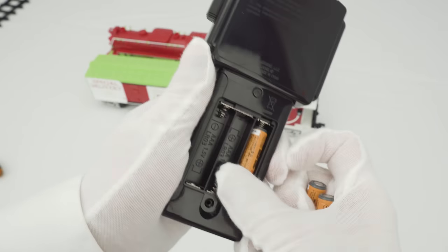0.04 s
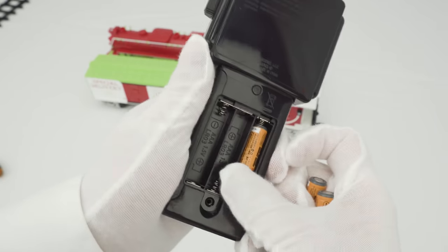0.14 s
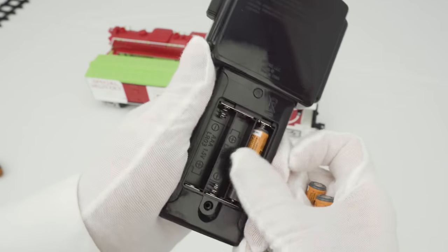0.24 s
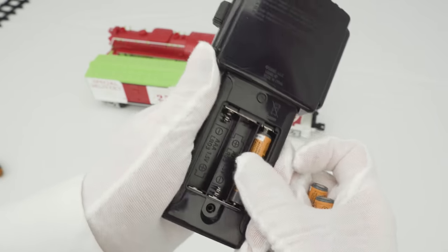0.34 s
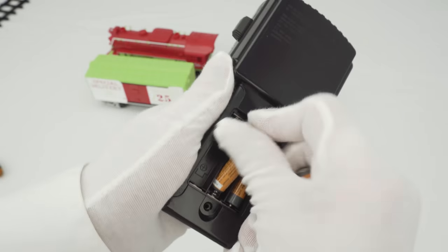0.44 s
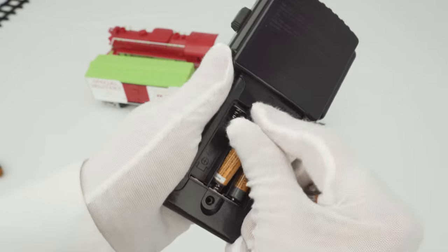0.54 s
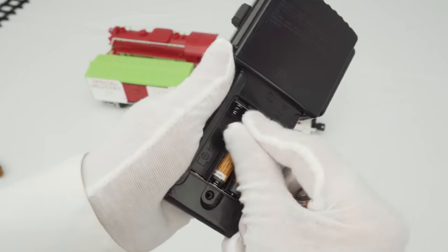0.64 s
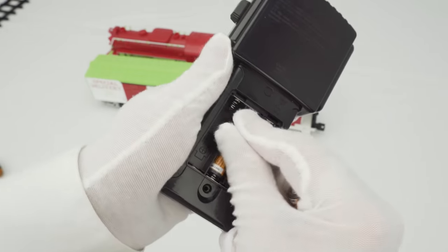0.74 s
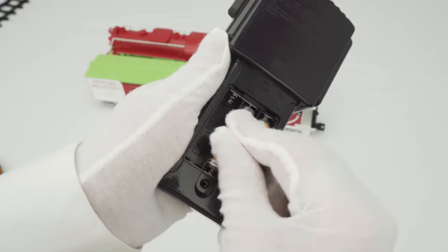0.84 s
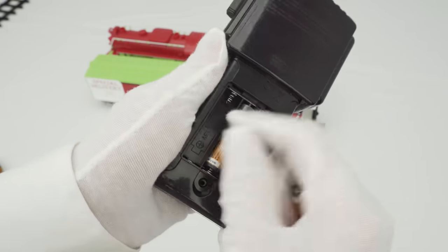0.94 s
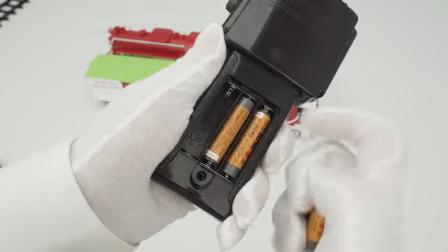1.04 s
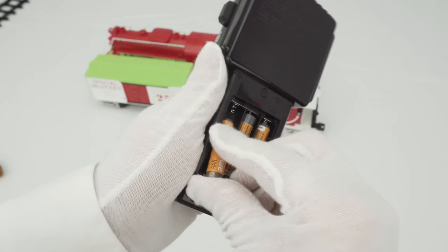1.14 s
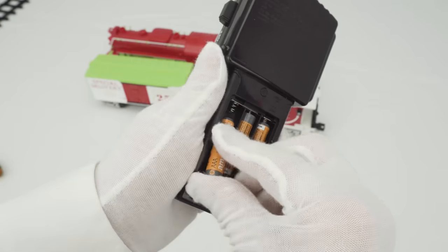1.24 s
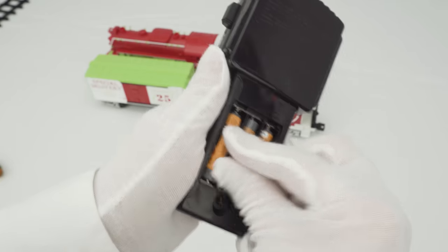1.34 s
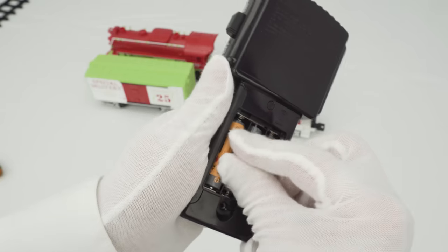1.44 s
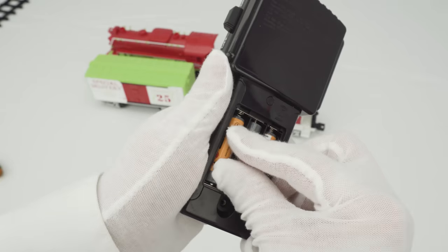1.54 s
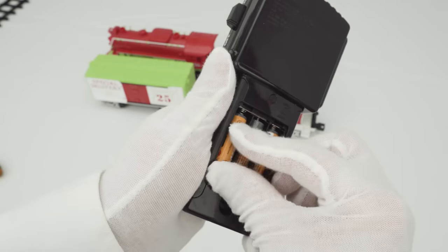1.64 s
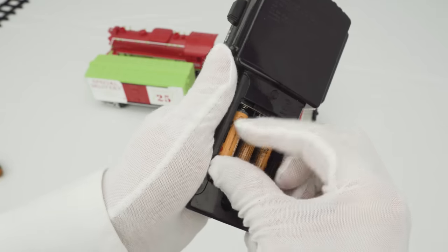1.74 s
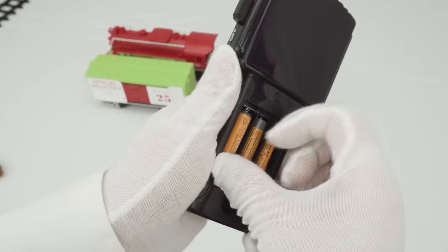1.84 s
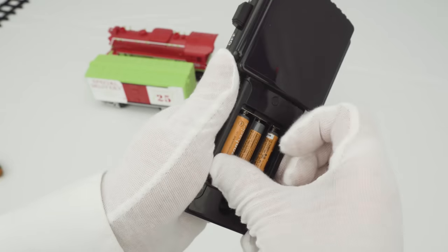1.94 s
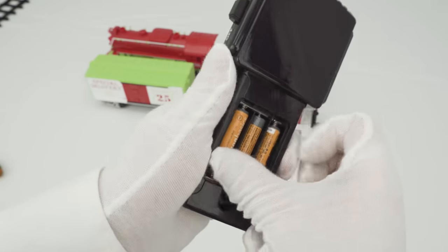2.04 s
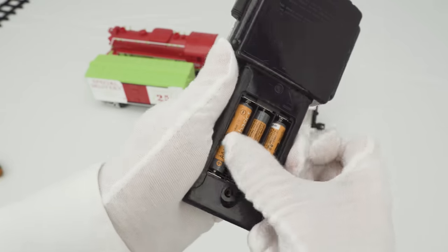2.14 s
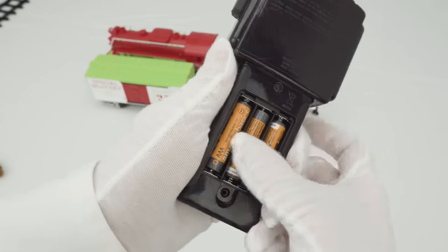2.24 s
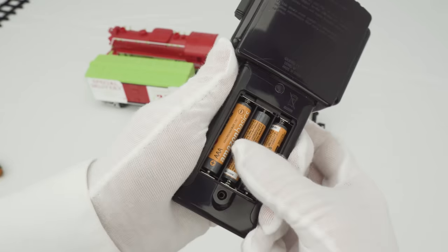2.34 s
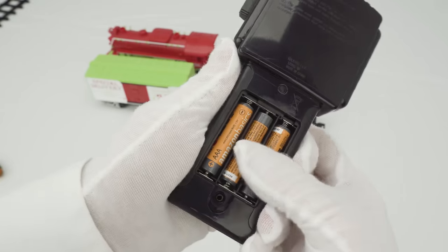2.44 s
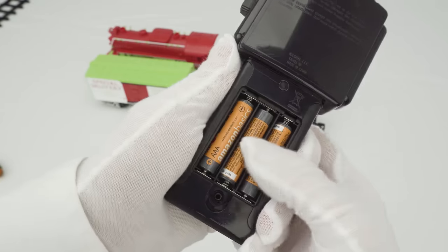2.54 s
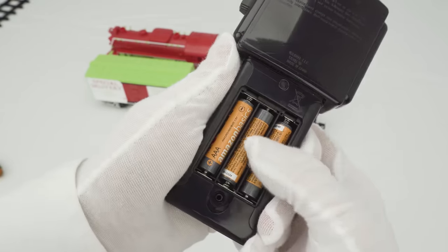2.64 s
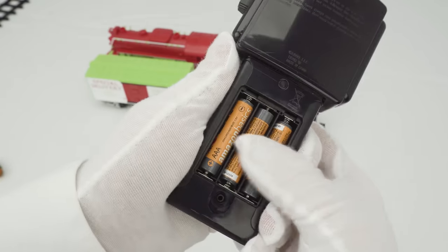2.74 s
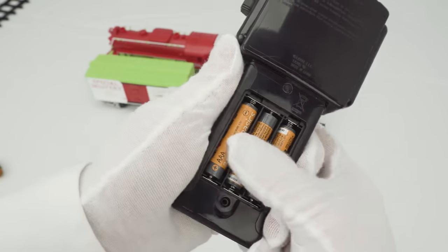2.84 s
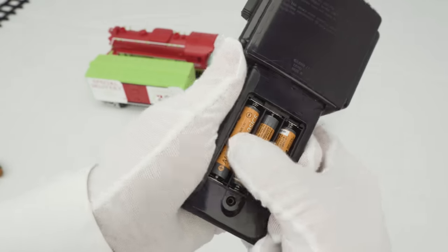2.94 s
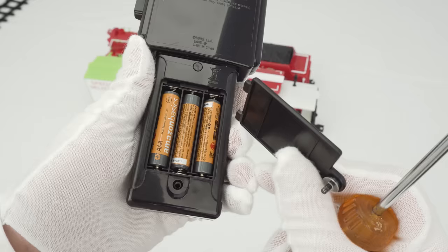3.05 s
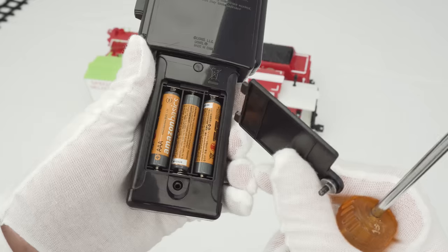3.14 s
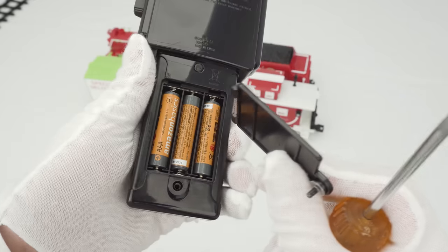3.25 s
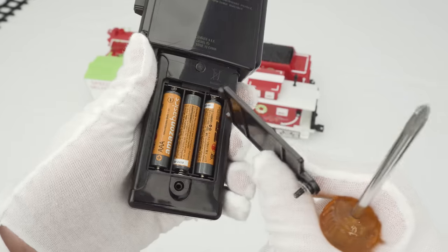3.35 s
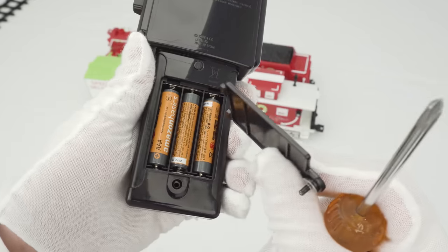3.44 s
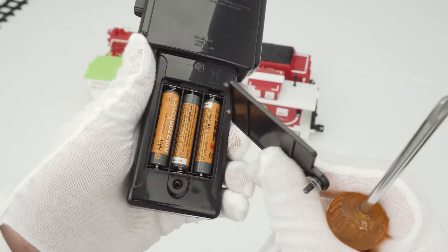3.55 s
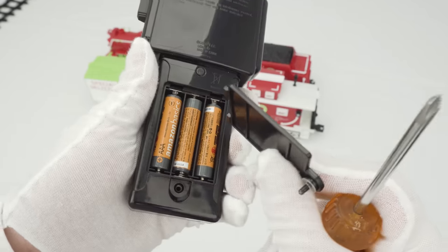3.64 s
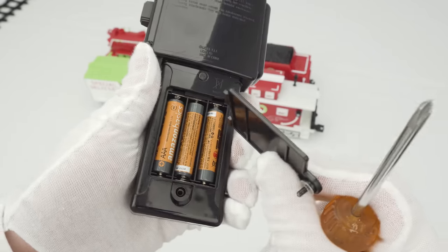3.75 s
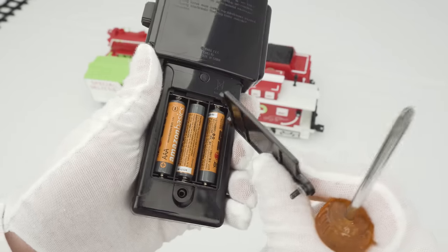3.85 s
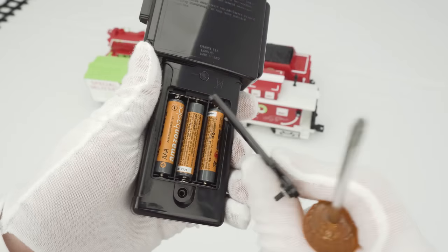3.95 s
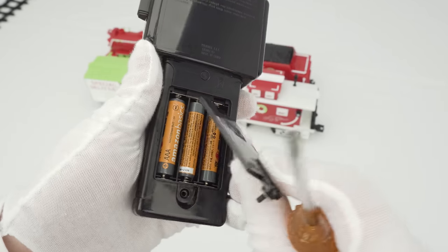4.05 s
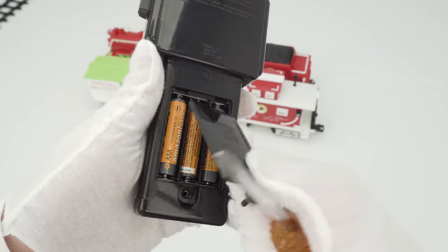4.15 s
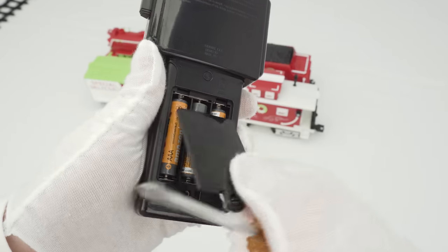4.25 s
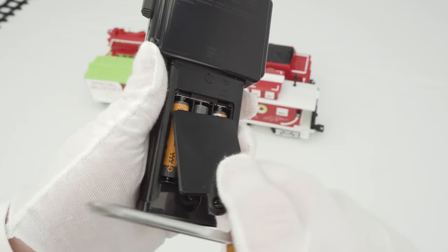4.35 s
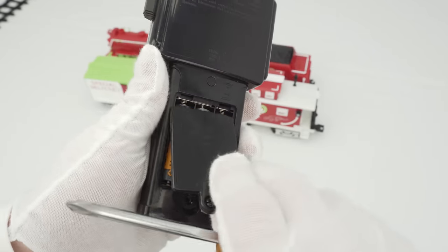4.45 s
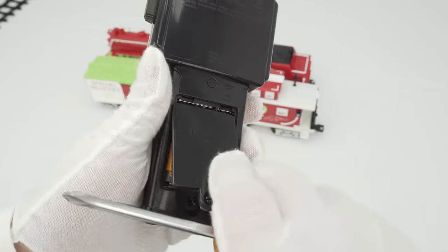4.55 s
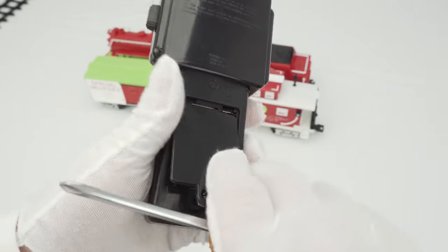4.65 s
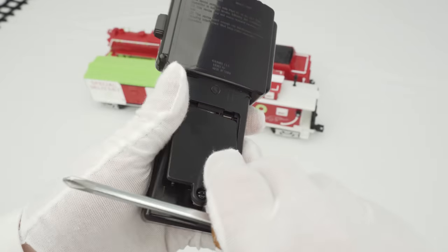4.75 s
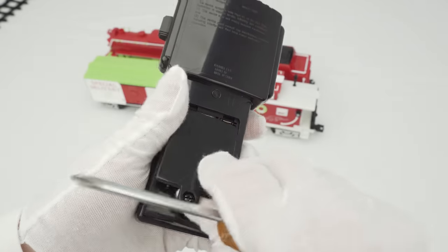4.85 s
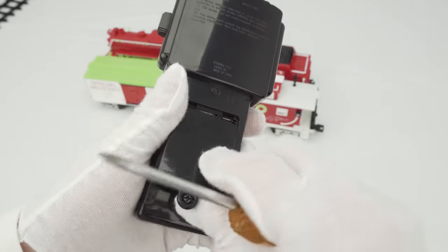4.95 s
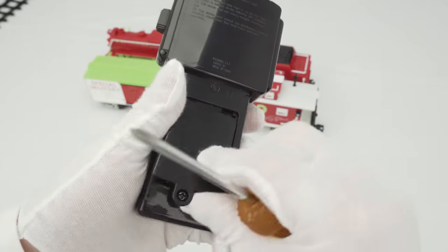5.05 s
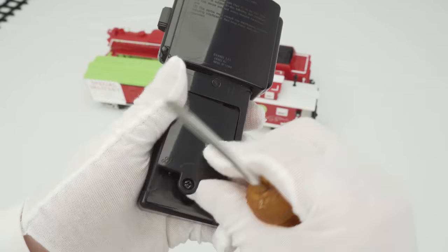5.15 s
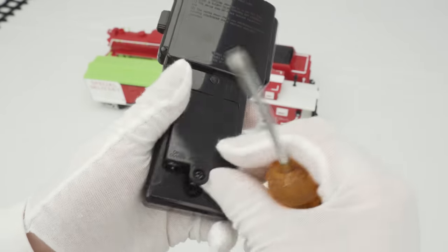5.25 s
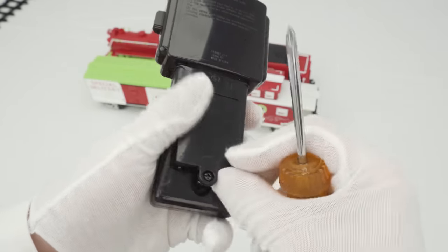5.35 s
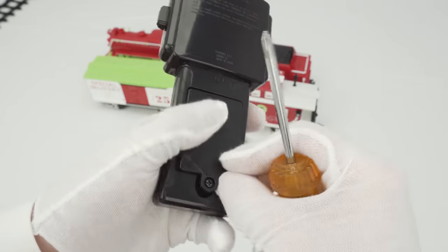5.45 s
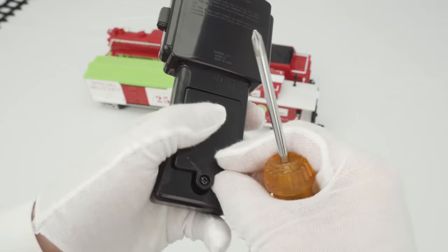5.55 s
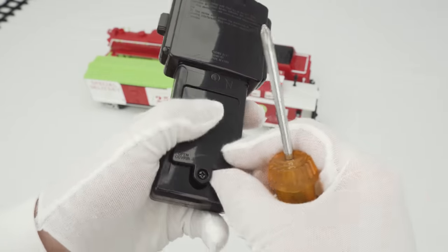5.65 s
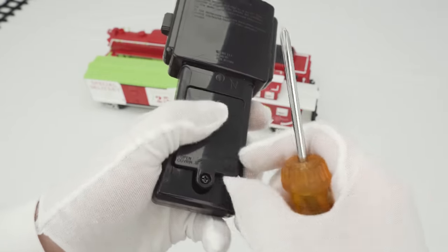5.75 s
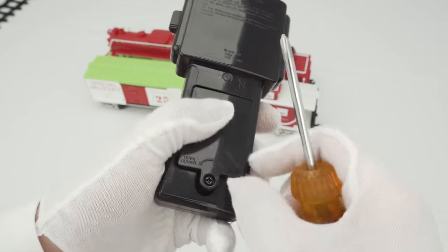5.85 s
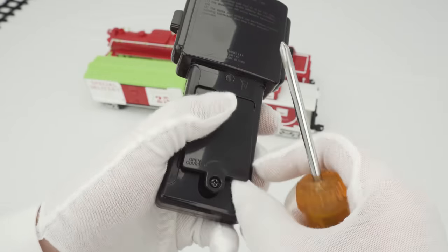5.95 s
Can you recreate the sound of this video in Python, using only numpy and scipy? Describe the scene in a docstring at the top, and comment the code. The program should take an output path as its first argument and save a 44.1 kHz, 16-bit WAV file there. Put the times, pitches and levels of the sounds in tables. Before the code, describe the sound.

Close to a stereo microphone in a small, quiet room, batteries snap one after another into a hollow plastic remote, rattling and rasping on their springs. A faint low drone sinks away at the start. Gloved fingers rub with a fine grain and roll the batteries, then pause. The loose cover is laid on with light, faintly ringing taps and clicks firmly home, leaving a few softer ticks and cloth brushing.

```python
"""Cotton gloves slide over a plastic remote, close to a stereo microphone pair, above a low sinking drone.
The hands press batteries in against their springs, roll them in the bay, lay the cover on and snap it
shut. Each contact rings the hollow case, the gloves rub in fine grains, and the loose cover hums when
tapped. A small room answers; the limiter ducks on the hard snaps, so the room swells up behind them."""
import sys
import numpy as np
from scipy import signal
from scipy.fft import rfft, irfft, next_fast_len
from scipy.io import wavfile
from scipy.ndimage import uniform_filter1d, minimum_filter1d, map_coordinates

SR = 44100
rng = np.random.default_rng(int(sys.argv[2]) if len(sys.argv) > 2 else 0)


def unload_wav(signal):
    """Save mono or channel-first audio to the path in sys.argv[1] as 16-bit WAV at rate SR, clipped to [-1, 1]."""
    wavfile.write(
        sys.argv[1],
        SR,
        np.round(np.clip(np.atleast_2d(signal).T, -1, 1) * 32767).astype(np.int16),
    )


N = 264600
TIME = np.arange(N) / SR


def amp(db):
    return 10 ** (np.asarray(db) / 20)


def unit(x):
    return x / np.sqrt(np.mean(x ** 2) + 1e-20)


def along(points, hz):
    """Read (frequency, value) points on a log axis."""
    freqs, values = np.transpose(points)
    return np.interp(np.log(hz + 1), np.log(freqs + 1), values)


def wobble(rate):
    """A smooth random curve, rate knots a second."""
    return map_coordinates(rng.standard_normal(int(N * rate / SR) + 4), [TIME * rate])


def filtered(x, response):
    """x through a complex frequency response."""
    size = next_fast_len(N + SR // 2)
    return irfft(rfft(x, size) * response(np.fft.rfftfreq(size, 1 / SR)), size)[..., :N]


def minimum_phase(gain):
    """The causal response that has this gain."""
    cepstrum = irfft(np.log(np.maximum(gain, 1e-6)))
    half = len(cepstrum) // 2
    cepstrum[1:half] *= 2
    cepstrum[half + 1:] = 0
    return np.exp(rfft(cepstrum))


def noise(response, likeness):
    """Coloured stereo noise of rms 1 with a given left-right likeness."""
    def mid_side(hz):
        angle = np.arccos(np.clip(along(likeness, hz), -1, 1)) / 2
        return response(hz) * np.array([np.cos(angle), np.sin(angle)])
    mid, side = filtered(rng.standard_normal((2, N)), mid_side)
    return unit(np.array([mid + side, mid - side]))


def hiss(spectrum, likeness):
    """Stereo noise with a (frequency, level) spectrum."""
    return noise(lambda hz: amp(along(spectrum, hz)), likeness)


# a low drone in the background: (time [s], fundamental [Hz], level [dB])
DRONE_PATH = [(0, 72.1, -59), (.25, 75, -53), (.4, 72.7, -57.5), (.6, 61.2, -57), (.72, 55.5, -80),
              (.9, 55, -81.5)]


def drone():
    """The second and third harmonics of a wavering pitch sink and fade within the first second."""
    times, pitches, levels = np.transpose(DRONE_PATH)
    pitch_hz = np.interp(TIME, times, pitches) * (1 + 0.017 * wobble(25))
    level_db = np.interp(TIME, times, levels) + 1.8 * wobble(20)
    phase = 2 * np.pi * np.cumsum(pitch_hz) / SR
    return amp(level_db) * unit(np.sin(2 * phase) + amp(-4) * np.sin(3 * phase))


# the air of the room: (frequency [Hz], relative density [dB])
AIR_SPECTRUM = [(12, -30.5), (20, -9.5), (44, -1.5), (65, -4.5), (113, -4), (168, -6), (262, -14),
                (285, -15), (472, -10.5), (897, -15), (1150, -12), (1330, -14.5), (1530, -17.5),
                (16000, -25.5)]
# diffuse sound at the two microphones: (frequency [Hz], left-right likeness [0-1])
DIFFUSE_LIKENESS = [(30, 1), (150, 0.83), (320, 0.57), (600, 0.3), (1650, 0.053), (5000, 0.106),
                    (15000, .1)]


def room_tone(level_db=-60.5):
    """Steady rumble and hiss all around the microphones."""
    return amp(level_db) * hiss(AIR_SPECTRUM, DIFFUSE_LIKENESS)


# the hands, close to the pair: (frequency [Hz], left-right likeness [0-1])
CLOSE_LIKENESS = [(500, 0.3), (4000, .75), (12000, 0.51)]


def friction(modes):
    """Close rubbing noise through resonances with steep skirts."""
    def response(f):
        return sum(amp(db) * abs(f * width / (centre ** 2 - f ** 2 + 1j * f * width)) ** 1.35
                   for centre, width, db in modes)
    return noise(response, CLOSE_LIKENESS)


def pressure(strokes, range_db=18):
    """Each stroke swells by range_db over its attack, holds, and falls as far over its release."""
    power = np.zeros(N)
    for s, db, attack, hold, release in strokes:
        away = np.maximum((s - TIME) / attack, 0) + np.maximum((TIME - s - hold) / release, 0)
        power += amp(db - range_db * np.minimum(away, 10)) ** 2
    return np.sqrt(power)


def rub(strokes, sound, grain_db):
    """Threads catch and slip, so friction comes in fine grains under the stroke."""
    return pressure(strokes) * unit(amp(grain_db * wobble(500)) * sound)


# close strokes: (time at full pressure [s], relative level [dB], attack [s], hold [s], release [s])
CASE_SLIDES = [(.105, -36.5, 0.067, 0.025, 0.063), (.15, -32.5, .04, 0.0071, 0.018),
               (1.062, -50, .035, .018, .02)]  # a glove slides on the case
BATTERY_ROLLS = [(2.19, -56.5, 0.055, 0.055, .05), (2.285, -41.5, 0.049, .012, 0.065),
                 (2.355, -52.5, 0.054, 0.063, 0.044), (2.65, -56, .25, .06, 0.041),
                 (2.864, -37, 0.029, 0.017, 0.021), (3, -67, .05, 0.051, 0.056)]  # the thumb rolls the batteries in their bay
COVER_STROKES = [(5.32, -55.5, .12, .2, .08)]  # the thumb rubs the closed cover
# what each kind of stroke rings: (frequency [Hz], width [Hz], relative level [dB])
SLIDE_MODES = [(2610, 390, 3.5), (3250, 270, 0.5), (3850, 330, 4.5), (5240, 180, 8.5), (12200, 4100, -19)]
ROLL_MODES = [(1040, 970, -19), (4070, 500, 2), (4830, 650, -21), (5560, 430, -3.5), (12000, 9100, -17.5)]
COVER_STROKE_MODES = [(2280, 330, 0.5), (4230, 520, -2)]
# the hands shift their grip: (time at full pressure [s], relative rustle level [dB],
# relative brushing level [dB], attack [s], hold [s], release [s])
GRIP_SHIFTS = [(0.095, -59.5, -57.5, 0.68, 0.6, .15), (0.92, -63.5, -58, 0.35, .15, 0.81),
               (2.04, -57.5, -58.5, 0.54, 0.17, 0.63), (2.98, -64, -67, 1, .05, 1.1),
               (4.346, -66.5, -59.5, 0.48, 0.42, .7), (5.188, -60, -54, 0.45, 0.32, 0.2),
               (5.747, -62, -60.5, 0.69, 0.13, 0.61)]
# bright brushing and dull rustle of the gloves: (frequency [Hz], relative density [dB])
BRUSH_SPECTRUM = [(350, -31), (900, -3), (1500, -15), (2250, -5.5), (3200, -10.5), (4250, -9),
                  (5300, -12.5), (8500, -15), (12000, -14.5), (16000, -17)]
RUSTLE_SPECTRUM = [(47, -38), (80, -6.5), (137, -2.5), (178, -14), (206, -3), (275, -0.5), (563, -17),
                   (700, -17.5), (910, -23.5), (1540, -120)]


def gloves():
    """Cotton on case, batteries and cover: returns the close rubbing and the grip's dull rustle."""
    brushes = [(s, db, *shape) for s, _, db, *shape in GRIP_SHIFTS]
    rustles = [(s, db, *shape) for s, db, _, *shape in GRIP_SHIFTS]
    slide = amp(-3.5) * rub(CASE_SLIDES, friction(SLIDE_MODES), grain_db=1.5)
    roll = amp(-1) * rub(BATTERY_ROLLS, friction(ROLL_MODES), grain_db=2.5)
    thumb = rub(COVER_STROKES, friction(COVER_STROKE_MODES), grain_db=2)
    brush = amp(-1.5) * rub(brushes, hiss(BRUSH_SPECTRUM, CLOSE_LIKENESS), grain_db=2)
    rustle = amp(2.5) * pressure(rustles) * hiss(RUSTLE_SPECTRUM, DIFFUSE_LIKENESS)
    return slide + roll + thumb + brush, rustle


# modes of the hollow case: (frequency [Hz], relative level [dB], t60 [s])
CASE_MODES = [(507, -21, 0.031), (915, -7.5, 0.024), (1045, -14, 0.046), (1232, -9.5, 0.023),
              (1840, -3, 0.00757), (2062, -6.5, 0.011), (2293, -6, 0.012), (2900, -1.5, 0.0076),
              (3300, -5.5, 0.0078), (3460, -8.5, 0.013), (4180, -0.5, 0.005), (5480, -5.5, 0.013),
              (5730, -15, 0.029)]


def case_blow(colour, chatter_s, mode_hz, size=4096, crack_db=5, crack_t60=0.0095, detune=0.0087):
    """A blow and its chatter ring the case: returns the sound at the pair and that sent into the room."""
    t, hz = np.arange(size) / SR, np.fft.rfftfreq(size, 1 / SR)
    force = rng.standard_normal(size) ** 3 * np.exp(-t / chatter_s)
    force *= 0.81 * np.sqrt(chatter_s / 0.0019) / np.linalg.norm(force)
    force[0] += 1  # the first impact
    # the grip shifts the modes a little
    ring = sum((-1) ** k * amp(db + 2 * rng.normal() - 60 * t / t60)
               * np.sin(2 * np.pi * f * (1 + rng.normal(0, detune)) * t)
               for k, (f, db, t60) in enumerate(CASE_MODES))
    # dense high modes merge into a crack that differs with direction
    crack = rng.standard_normal(size) + 0.58 * rng.standard_normal((2, size))
    blow = rfft(force) * rfft(ring + amp(crack_db - 60 * t / crack_t60) * crack)
    band_levels = [(f, 10 * np.log10(np.mean(abs(blow[:, abs(np.log((hz + 1) / f)) < .25]) ** 2)))
                   for f in np.geomspace(150, 15000, num=16)]
    flattened = blow / minimum_phase(amp(along(band_levels, hz)))
    # the hardness of the blow sets the broad colour, and its place favours one mode
    colour_db = along(colour, hz)
    favoured_db = 8 / (1 + ((hz / mode_hz - 1) / 0.075) ** 2)
    near = irfft(flattened * minimum_phase(amp(colour_db + favoured_db)))
    # summed over all directions, the peaks and notches even out
    around = irfft(minimum_phase(amp(colour_db + 0.42 * favoured_db)))
    return near, around


# Strength is the level at 3.2 kHz; knock (900 Hz), body (1.8 kHz), edge (5.2 kHz), fizz (10 kHz)
# and room send are relative to it.
# batteries and cover touch the case: (time [s], strength [dB], knock [dB], fizz [dB], chatter [s])
LIGHT_TOUCHES = [(0.247, -7, -15, -42, 0.0044), (0.2637, 3.5, -11, -27, .0048),
                 (.589, -11, -0.5, -23, .002), (.633, -11, 1, -26, 0.0038), (0.675, 1.5, -17, -12.5, .004),
                 (1.078, -28, -11, 2, .003), (1.204, -9.5, 9, 8, 0.002), (1.2165, 9.5, -1.5, -12.5, 0.0017),
                 (1.8685, 5.5, -5, -13.5, 0.0049), (2.127, -25.5, 3, -2, .001),
                 (4.138, -5, -4.5, -25, 0.00056), (4.3531, -4, -1, -14.5, 0.00051),
                 (4.455, -7.5, -1, -48, 0.0018), (4.4921, -10, -2, -21, 0.0043),
                 (4.512, -15.5, 1, -9.5, 0.0027), (4.576, -16.5, 10, -26, 0.0058),
                 (4.598, -16.5, -1, -20, 0.0034), (4.895, -9, -8, -6, 0.0033),
                 (5.1731, -18.5, 9, -23, .002), (5.198, -11, -4, -31, 0.0014),
                 (5.3276, -11, -17, -26, 0.007), (5.5198, -15, -17, -7, 0.0065),
                 (5.5791, -21, -4, -25, 0.00096), (5.7863, -20.5, 1, -9, 0.012)]
# a battery or the cover snaps home: (time [s], strength [dB], knock [dB], edge [dB], fizz [dB],
# chatter [s], room send [dB], favoured mode [Hz])
HARD_SNAPS = [(0.2683, 22, -3, -6.5, -17.5, 0.0018, 3.5, 2790), (.6366, 11, 1, -6, -24, 0.0023, 4, 3640),
              (0.6387, 20.4, -5.5, -16, -30, 0.00049, -8, 1760), (.685, 29, -16, -11, -21, .0005, 2, 3350),
              (.7435, 21, -2, -0.5, -16.5, 0.00096, .5, 1730),
              (1.2092, 23, -3, -8.5, -19.5, 0.00049, 0, 1650),
              (1.437, 14.5, 3.5, -2, -15, .0008, 0.5, 1700),
              (1.778, 10.9, -10, -6.5, -17, 0.00037, 3, 1750),
              (1.875, 1.8, 7, -4, -18.5, 0.00056, -0.5, 916),
              (4.897, 9.5, -7.5, -31, -22, 0.00068, -1.5, 2560),
              (4.8998, 22.5, -11, -21.5, -24, .0006, -1.5, 1893),
              (5.1329, 9.5, -10, -11, -12, 0.00021, -2, 3180), (5.134, -3.5, -12, 1.5, -9, .0011, -2, 5250),
              (5.218, .5, 7, -12, -19.5, 0.00096, -3, 877)]
# the last battery rattles into its bay:
# (strength [dB], knock [dB], edge [dB], fizz [dB], chatter [s], room send [dB])
BATTERY_RATTLE = (15.5, 5.5, -3.5, -10.5, .0032, -5)


def contacts(rattle_at=1.3942, bounce_s=0.005, loss_db=0.5, dulling_db=0.8, end_modes_hz=(1372, 1980)):
    """Lists every blow; the rattling battery's two ends strike in turn, weaker and duller each bounce."""
    db, knock, edge, fizz, chatter, send = BATTERY_RATTLE
    bounces = [(rattle_at + k * bounce_s, db - k * loss_db, knock, edge - k * dulling_db,
                fizz - k * dulling_db, chatter, send, end_modes_hz[k % 2]) for k in range(5)]
    # a hard blow's body lies 3 dB over its knock
    hard = [(s, db, knock, knock + 3, *rest) for s, db, knock, *rest in HARD_SNAPS + bounces]
    body_db, edge_share, send_db, mode_hz = -3, .42, -0.5, 899  # shared by all light touches
    light = [(s, db, knock, body_db, edge_share * fizz, fizz, chatter, send_db, mode_hz)
             for s, db, knock, fizz, chatter in LIGHT_TOUCHES]
    return hard + light


def clicks():
    """Batteries and cover strike and seat in the case: direct sound, and sound thrown into the room."""
    direct, thrown = np.zeros((2, N + SR)), np.zeros(N + SR)
    for s, db, knock, body, edge, fizz, chatter_s, send_db, mode_hz in contacts():
        colour = [(60, knock - 32), (250, knock - 16.5), (500, knock - 10), (900, knock + 1),
                  (1450, (knock + body) / 2 - 3), (1800, body), (3200, 0.0048), (5200, edge),
                  (6800, fizz + 2), (10000, fizz), (15000, fizz - 3)]
        near, around = case_blow(colour, chatter_s, mode_hz)
        span = slice(round(s * SR), round(s * SR) + len(around))
        direct[:, span] += amp(db) * near
        thrown[span] += amp(db + send_db) * around
    return direct[:, :N], thrown[:N]


# a battery scrapes along its spring, close up: (time [s], level [dB], half length [s])
SPRING_SCRAPES = [(.447, -53.5, 0.0084), (1.8918, -23, 0.0012), (1.893, -43, .013), (1.9, -37, .0008),
                  (2.574, -49, 0.0013), (2.651, -42.5, .0008), (2.855, -43, 0.001), (2.991, -43, 0.0008),
                  (3.027, -47, 0.0011)]
# the spring's resonances: (frequency [Hz], width [Hz], relative level [dB])
SPRING_MODES = [(4153, 150, 7), (5220, 600, -8), (5900, 150, -2), (7700, 2600, -17.5), (13300, 8300, -19.5)]


def spring_scrapes():
    """Short metallic rasps of battery ends on their springs."""
    push = sum(amp(db) * np.exp(-((TIME - s) / half) ** 2 / 2) for s, db, half in SPRING_SCRAPES)
    return push * friction(SPRING_MODES)


# low jolts near the microphones: (time [s], frequency [Hz], level [dB], t60 [s])
BATTERY_THUMPS = [(0.635, 134, -50, 0.11), (0.676, 120, -41.5, 0.065), (1.867, 122, -43, 0.096)]


def battery_thumps():
    """A battery that bottoms out jolts the case in the hand."""
    out = np.zeros(N)
    for s, hz, db, t60 in BATTERY_THUMPS:
        age = np.maximum(TIME - s, 0)
        out += amp(db - 60 * age / t60) * np.sin(2 * np.pi * hz * age)
    return out


# the cover lying loose on the case: (frequency [Hz], relative level [dB], t60 [s])
COVER_MODES = [(876, -2, 0.54), (1087, 2.5, 0.2), (1207, -1.5, 0.26)]


def cover_hum(gain_db=-50, loose_from=4, loose_until=4.8):
    """Until it is seated, the thin cover hums on after each tap."""
    out, t = np.zeros(N + SR), np.arange(SR // 3) / SR
    for s, db, knock, *_ in LIGHT_TOUCHES:
        if loose_from < s < loose_until:
            ring = sum(amp(level + 2 * rng.normal() - 60 * t / t60) * np.sin(2 * np.pi * hz * t)
                       for hz, level, t60 in COVER_MODES)
            out[round(s * SR):][:len(t)] += amp(db + knock + gain_db) * ring
    return out[:N]


# the small room around the microphones: (frequency [Hz], t60 [s])
ROOM_DECAY = [(200, 0.42), (1000, 0.36), (3000, 0.3), (6000, 0.28), (14000, 0.22)]
# what its walls send back: (frequency [Hz], level [dB])
WALL_RETURN = [(200, -3.5), (800, -2), (1500, -5), (3000, -9.5), (6000, -11.5), (14000, -13)]


def room(x, width=0.48, onset_s=0.0013):
    """The room's diffuse answer; a new tail every half second stands for the moving hands."""
    out, block = np.zeros((2, N + SR)), SR // 2
    for start in range(0, N, block):
        hz, t, spectra = signal.stft(rng.standard_normal((2, block)), SR, nperseg=256)
        fade = amp(-60 * t / along(ROOM_DECAY, hz)[:, None]) * (1 - np.exp(-t / onset_s))
        fade *= (amp(along(WALL_RETURN, hz)) / np.sqrt(np.mean(fade ** 2, axis=1) * block))[:, None]
        mid, side = signal.istft(spectra * fade, SR, nperseg=256)[1]
        tail = np.array([mid + width * side, mid - width * side]) / np.hypot(1, width)
        wet = signal.fftconvolve(x[:, start:start + block], tail, axes=1)
        out[:, start:start + wet.shape[1]] += wet
    return out[:, :N]


# balance across the microphone pair: (frequency [Hz], left minus right [dB])
PAIR_BALANCE = [(200, -0.5), (700, -1.5), (2200, -2.5), (4500, 0), (8000, 0.5), (13000, -1)]


def scene(left_lag_s=.00001):
    """The hands work close to the microphone pair, slightly to its right."""
    snaps, thrown = clicks()
    scrapes = spring_scrapes()
    rubbing, rustle = gloves()
    handling = scrapes + rubbing + battery_thumps() + cover_hum()
    sides = np.array([[0.5], [-0.5]])
    direct = filtered(snaps + handling, lambda hz: np.exp(-2j * np.pi * hz * left_lag_s * sides))
    remote = filtered(direct + room(thrown + handling), lambda hz: amp(sides * along(PAIR_BALANCE, hz)))
    return remote + rustle + drone() + room_tone()


def limiter(x, ceiling_db=-14, release_db_per_s=140, window_s=0.0013, ahead_s=0.00092):
    """Gain falls just before a loud snap and climbs back steadily."""
    power = abs(uniform_filter1d(np.mean(x ** 2, axis=0), int(window_s * SR)))
    over_db = np.maximum(10 * np.log10(power + 1e-12) - ceiling_db, 0)
    climb_db = release_db_per_s * TIME
    cut_db = np.maximum.accumulate(over_db + climb_db) - climb_db
    span = int(ahead_s * SR)
    return x * amp(uniform_filter1d(minimum_filter1d(-cut_db, 2 * span), span))


def record(dry, peak=.75, top_hz=16100):
    """Behind the microphones: a limiter, softly rounded peaks and a steep band limit."""
    limited = limiter(dry)
    rounded = limited / (1 + (limited / peak) ** 4) ** (1 / 4)
    return filtered(rounded, lambda hz: 1 / np.sqrt(1 + (hz / top_hz) ** 160))


dry = scene()
out = record(dry)
unload_wav(out)
```